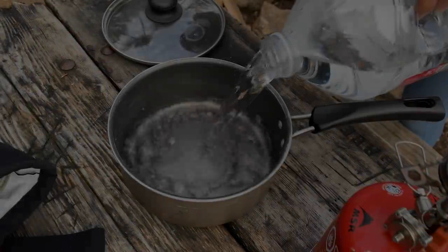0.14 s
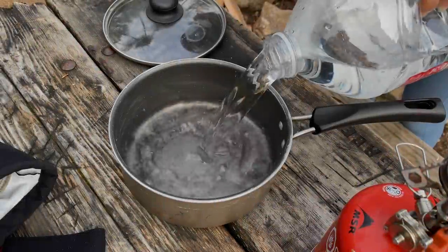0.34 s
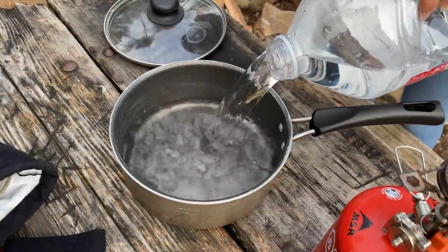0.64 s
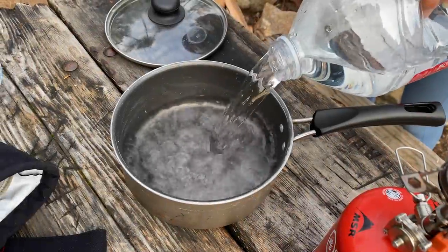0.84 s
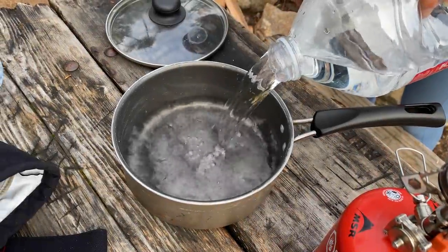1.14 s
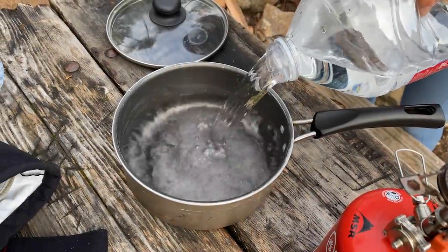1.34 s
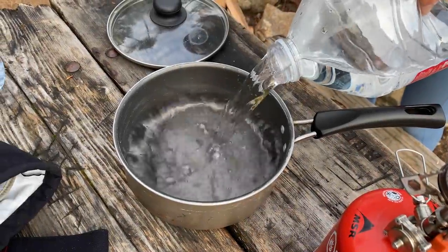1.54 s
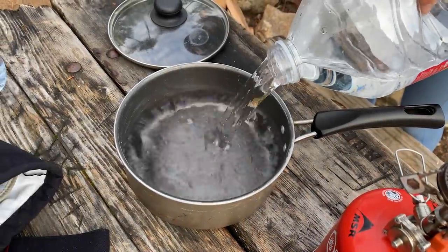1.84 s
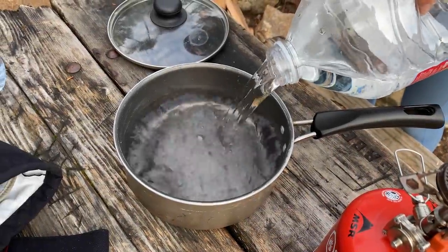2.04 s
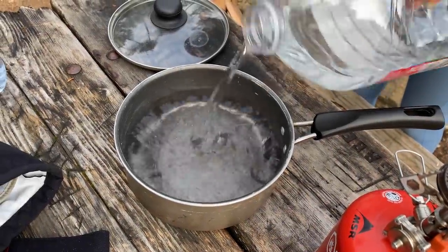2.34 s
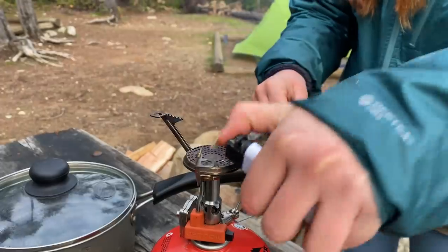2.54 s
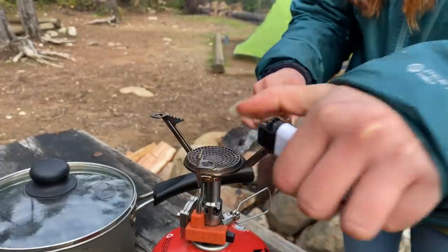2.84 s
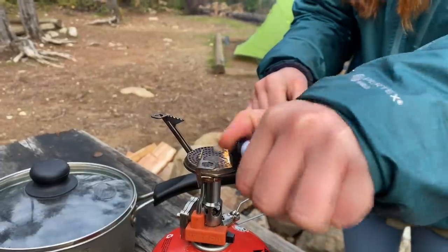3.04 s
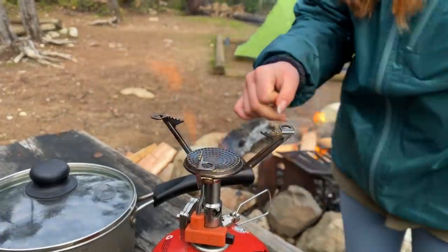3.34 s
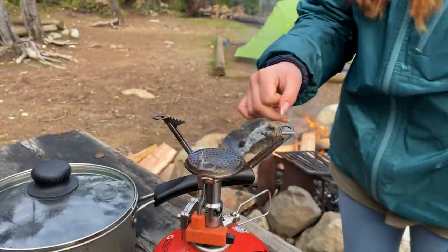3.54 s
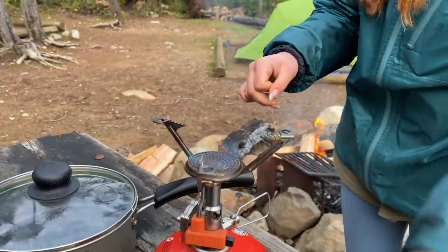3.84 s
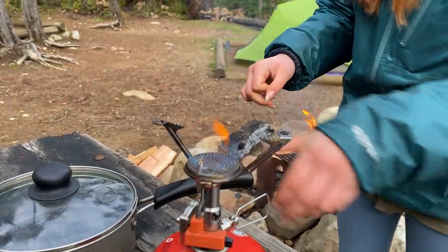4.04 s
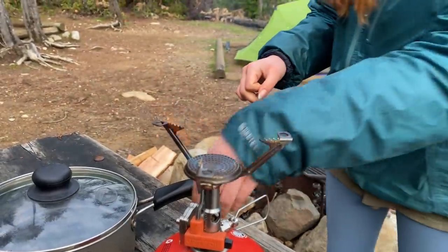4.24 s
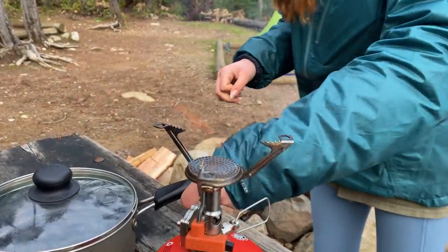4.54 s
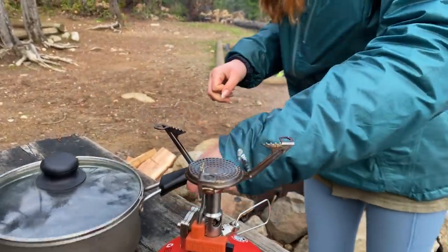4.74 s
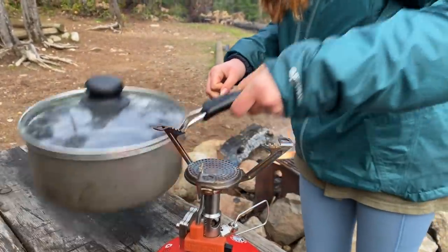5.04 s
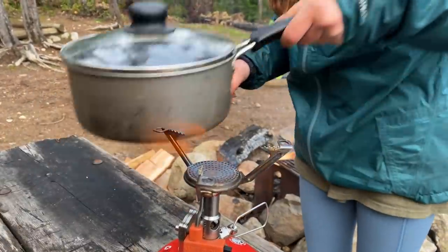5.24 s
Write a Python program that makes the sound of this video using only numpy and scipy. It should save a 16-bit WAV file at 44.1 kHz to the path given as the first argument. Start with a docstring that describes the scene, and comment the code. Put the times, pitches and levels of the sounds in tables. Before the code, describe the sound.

Close outdoor sound. Water pours into a metal pot with lively bubbling and fine splashes, strongest in the first second, then thinning to a trickle with a last few plops. Gas starts hissing, a lighter wheel rasps twice, and the burner catches with a low thump. The flame roars and flutters to the end, while the lighter clacks onto the wooden table with small ticks around it. Faint wind pushes on the microphone.

```python
"""Water and a camp stove outdoors

In a light breeze water pours from a jug into a metal pot: ringing sines for bubbles, puffs of noise for
droplets, noise through pot resonances. Then gas hisses as coloured noise, a lighter wheel is struck twice
as gritty clicks, the gas catches with a pressure thump and the flame roars as fluttering noise. The lighter
drops on the wooden table, its body modes ringing; low wind noise on the microphone and a woodland hush remain.
"""
import sys
import numpy as np
from scipy import signal
from scipy.fft import rfft, irfft, next_fast_len
from scipy.io import wavfile

SR = 44100
rng = np.random.default_rng(int(sys.argv[2]) if len(sys.argv) > 2 else 0)


def store_pcm(level_fs):
    """Save levels as 16-bit WAV."""
    pcm = np.round(np.clip(level_fs, -1, 1) * 32767).astype(np.int16)
    wavfile.write(sys.argv[1], SR, np.atleast_2d(pcm).T)


N = 237903  # samples

# Strength of the stream into the pot, as froth gain: (time [s], level [dB])
POUR_STRENGTH = [(0, -54), (0.14, -59), (0.28, -49), (0.42, -55.5), (0.49, -47), (0.77, -46.5),
                 (0.83, -51.5), (0.9, -44), (0.96, -49), (1.0, -55.5), (1.26, -60), (1.32, -67),
                 (1.46, -59.5), (1.74, -62.5), (1.96, -72), (2.14, -59.5), (2.25, -79), (2.29, -58),
                 (2.43, -61.5)]
SPRAY_DB, SPRAY_GUST_DB = -51, 4  # gain at the strongest flow; spread of the gusts
SPRAY_FOLLOWS = 0.65              # share of the stream's swing in dB
SPRAY_FADE_DB_PER_S = 7           # the spray thins as the pot fills


def water():
    """The stream's strength drives froth and spray; pot walls blend them with the bubbles, over the churning."""
    t = np.arange(N) / SR
    pour_end = POUR_STRENGTH[-1][0]
    froth_db, = in_time(POUR_STRENGTH)
    spray_db = SPRAY_DB + SPRAY_FOLLOWS * (froth_db - froth_db.max())
    spray_db = spray_db - SPRAY_FADE_DB_PER_S * np.minimum(t, pour_end) + SPRAY_GUST_DB * drift(4.3)
    stream = (t < pour_end) * (froth(froth_db) + spray(spray_db))
    return hollow(bubbles() + stream) + pot()


# The clearest bubbles in the pot, level before the onset swell:
# (time [s], starting pitch [Hz], level [dB], 60 dB decay time [s])
CLEAR_BUBBLES = [(0.023, 612, -39, 0.038), (0.097, 3770, -36, 0.011), (0.133, 1420, -21, 0.0098),
                 (0.167, 3900, -33, 0.016), (0.172, 522, -35.5, 0.1), (0.238, 5700, -37.5, 0.02),
                 (0.243, 2070, -40, 0.04), (0.251, 1540, -34.5, 0.022), (0.263, 775, -43, 0.12),
                 (0.288, 6420, -37.5, 0.018), (0.295, 3300, -37, 0.018), (0.41, 4880, -37, 0.025),
                 (0.537, 3460, -35, 0.015), (0.584, 1350, -28.5, 0.031), (0.585, 2820, -28, 0.028),
                 (0.67, 2466, -27, 0.029), (0.673, 5800, -32.5, 0.02), (0.722, 1860, -29, 0.016),
                 (0.731, 1210.0, -33, 0.078), (0.804, 1390, -31.5, 0.026), (0.913, 1200, -30, 0.028),
                 (0.941, 1187, -39, 0.1), (0.943, 1750, -32, 0.018), (1.253, 5640, -43, 0.014),
                 (1.431, 746, -49.5, 0.21), (1.474, 2560, -44, 0.02), (1.509, 990.0, -44, 0.038),
                 (1.551, 2720, -36, 0.018), (1.55, 4780, -40.5, 0.023), (1.556, 1650, -36, 0.023),
                 (1.576, 5500, -37.5, 0.0094), (1.62, 4100, -41.5, 0.047), (1.698, 3100, -36.5, 0.011),
                 (1.7, 3970, -38, 0.033), (1.855, 3580, -39, 0.013), (1.969, 4110, -37, 0.031),
                 (2.008, 3900, -47, 0.021), (2.078, 8170, -45, 0.013), (2.272, 4030, -33, 0.017),
                 (2.287, 1617, -36.5, 0.046), (2.299, 2820, -29, 0.02), (2.311, 1100, -42, 0.02),
                 (2.355, 2680, -38, 0.041), (2.378, 7340, -34, 0.006), (2.385, 1550, -39, 0.04)]


def bubbles():
    """Each bubble is a dying sine with a short slap; pitch climbs, most for big low ones nearing the surface."""
    out = np.zeros(N)
    slap_i = np.arange(400)
    chance = rng.standard_normal((len(CLEAR_BUBBLES), len(slap_i)))
    slaps = signal.lfilter([.3], [1, -1.0, .4], chance) * np.exp(-slap_i / SR / 0.002)
    for (s, hz, level_db, t60), slap in zip(CLEAR_BUBBLES, slaps):
        t = np.arange(int(abs(t60) * SR) + 20) / SR
        pitch = hz * (1 + 0.48 * t / t60 * min(800 / hz, 1.2))
        swell = 1 - np.exp(-t * hz * 3.6)  # the bubble pinches off within a cycle
        decay = from_db(level_db - 60 * t / t60)
        add(out, s, swell * decay * np.sin(2 * np.pi * np.cumsum(pitch) / SR))
        add(out, s, from_db(level_db - 7.5) * slap)
    return out


# Colour of the small bubbles, relative; the rings are also weighted by their pitch:
# (frequency [Hz], level [dB])
FROTH_COLOUR = [(500, -45), (800, -22), (1230, 2), (2240, -0.5), (2560, 2), (4270, -6.5), (7570, -14.5),
                (10000, -38)]
FROTH_PER_S = 5000  # births a second at the strongest flow, before clumping
FROTH_CYCLES = 43   # cycles in the 60 dB decay time of a 2 kHz bubble


def froth(level_db):
    """Small bubbles are born in clumps, more in a stronger flow; each swells and rings some cycles."""
    flow = from_db(0.55 * (level_db - level_db.max()))
    clumps = from_db(2.4 * drift(34))
    born = grains(FROTH_PER_S * flow * clumps, spread_db=5.5) / np.sqrt(flow)
    pitches = np.geomspace(700, 10000, 48)
    dealt = rng.integers(0, len(pitches), N)
    rings = 0
    for k, hz in enumerate(pitches):
        t60 = FROTH_CYCLES * (hz / 2000) ** 0.62 / hz
        # a thin trickle makes mostly middle-sized bubbles
        reach = flow ** (.5 * abs(np.log(hz / 3200)))
        # a second, slightly detuned resonance softens the onset
        ringing = ring(ring(born * (dealt == k), hz, t60), hz * 1.074, t60 / 2)
        rings = rings + reach * from_db(at_hz(FROTH_COLOUR, hz)) * hz * rms_one(ringing)
    # a strong flow blurs the finest bubbles into a wash
    wash = flow * coloured(rng.standard_normal(N), [*FROTH_COLOUR, (15500, -30)])
    return from_db(level_db) * (rms_one(rings) + .8 * wash)


# The clearest droplets landing, level of the click before it becomes a puff: (time [s], level [dB])
CLEAR_DROPLETS = [(0.1326, -48), (0.1955, -40), (0.2229, -39.5), (0.2594, -39), (0.3316, -31), (0.842, -42),
                  (0.877, -36), (0.953, -40), (0.998, -43), (1.1717, -42), (1.2012, -44), (1.2526, -47),
                  (1.3005, -38.5), (2.31, -39)]
SPRAY_PER_S = 1600  # droplets a second at the strongest flow


def spray(level_db):
    """Droplets hit the surface as short bright ticks: a fine patter and a few clear, sharper ones."""
    flow = from_db(.6 * (level_db - level_db.max()))
    patter = grains(SPRAY_PER_S * flow, spread_db=8.5) / np.sqrt(flow)
    soft = burst(patter, 0.012, [6000, 10000])
    sharp = burst(patter, 0.0037, [7000, 15000])
    drops = np.zeros(N)
    for s, click_db in CLEAR_DROPLETS:
        drops[int(s * SR)] = from_db(click_db)
    return from_db(level_db) * rms_one(soft + .5 * sharp) + burst(drops, 0.0027, [7000, 15000])


# Air space of the pot, shaken by the churning water, levels relative:
# (frequency [Hz], width [Hz], level [dB])
POT_RESONANCES = [(413, 47, -19), (475, 110, 1), (990, 55, -1)]
# Hollow wavering notes as the last water settles, level before wavering:
# (start time [s], length [s], pitch before wavering and sinking [Hz], level [dB])
LAST_GLUGS = [(2.334, 0.095, 990, -51), (2.347, 0.11, 1325, -56), (2.401, .085, 800, -54.5)]


def pot():
    """Lumpy churning noise through the hollow resonances of the pot, and the last glugs."""
    churn = from_db(2 * drift(34)) * rng.standard_normal(N)
    strength = churning()
    out = np.zeros(N)
    for hz, width, level_db in POT_RESONANCES:
        t60 = np.log(1000) / (np.pi * width)
        resonance = ring(ring(churn, hz, t60), hz, t60 / 2)
        out += strength * from_db(level_db) * rms_one(resonance)
    for s, length, hz, level_db in LAST_GLUGS:
        t = np.arange(int(length * SR)) / SR
        waver = drift(36)[:len(t)]
        pitch = hz * (1 + 0.034 * waver - 0.027 * t / length)
        note = np.sin(2 * np.pi * np.cumsum(pitch) / SR)
        level = from_db(level_db + 2.8 * drift(39)[:len(t)])
        add(out, s, level * np.sqrt(np.sin(np.pi * t / length)) * note)
    return out


# Spells of churning in the pot, each swelling until it stops:
# (start [s], stop [s], gain at the stop [dB], swell [dB/s])
CHURN_SPELLS = [(0, 0.968, -59, 11.5), (2.345, 2.48, -63, 5)]
CHURN_RELEASE_DB_PER_S = 500


def churning():
    """Gain of the churning: it swells steadily in dB, then falls away fast."""
    t = np.arange(N) / SR
    strength = 0
    for start, stop, stop_db, swell in CHURN_SPELLS:
        slope = np.where(t < stop, swell, -CHURN_RELEASE_DB_PER_S)
        strength = strength + (t > start) * from_db(stop_db - slope * (stop - t))
    return strength


def hollow(x):
    """Sound bounces between the pot walls: a short diffuse tail blends the water."""
    t = np.arange(int(.08 * SR)) / SR
    tail = rms_one(rng.standard_normal(len(t))) * from_db(-24 - 60 * t / 0.034)
    return x + signal.fftconvolve(x, tail)[:N]


# Flame on the stove, levels before flutter: (time [s], roar level [dB], ragged edge level [dB])
FLAME_LEVELS = [(3.115, -32, -44), (3.18, -33, -46), (3.3, -31, -39.5), (3.45, -32, -40),
                (3.62, -29.5, -41), (4.6, -33.5, -44.5), (4.88, -32, -43.5), (5.1, -33.5, -45.5),
                (5.25, -29.5, -44), (5.39, -32, -39)]
# Colour of the low roar, relative: (frequency [Hz], level [dB per Hz])
ROAR_COLOUR = [(24, -48), (40, -15), (125, -5.5), (262, 0), (307, -4), (388, -3.5), (512, -9), (792, -6),
               (1170, -16), (1300, -23), (1690, -22), (2860, -120)]
# Colour of the ragged edge, relative: (frequency [Hz], level [dB per Hz])
EDGE_COLOUR = [(760, -59), (1300, 1.5), (1930, -3.5), (2250, -1), (3450, -10), (4050, -6.5), (4500, -15.5),
               (5100, -14), (5550, -11.5), (6800, -21.5), (8060, -17.5), (9000, -22), (11400, -41),
               (12100, -31), (12700, -36), (15500, -36)]


def flame():
    """Turbulent burning: a low roar and a brighter ragged edge that flutter together."""
    roar_db, edge_db = in_time(FLAME_LEVELS)
    lit = np.clip((np.arange(N) / SR - GAS_CATCHING[0]) / 0.0022, 0, 1)
    flutter = drift(37)
    roar_gain = from_db(roar_db + 0.88 * flutter + 0.52 * drift(6.3))
    edge_gain = from_db(edge_db + 0.93 * flutter + 1.57 * drift(190))
    roar = roar_gain * coloured(rng.standard_normal(N), ROAR_COLOUR)
    edge = edge_gain * coloured(rng.standard_normal(N), EDGE_COLOUR)
    return lit * (roar + edge)


# Colour of the hiss at the nozzle, relative: (frequency [Hz], level [dB per Hz])
HISS_COLOUR = [(590, -42), (1000, -20), (1640, -21.5), (1860, -20.5), (2060, -25), (2740, -15), (3040, -14),
               (4100, -3), (5590, -15.5), (8340, -11), (10300, -26.5), (11900, -24.5), (15500, -28)]
JET_OPENS_S, JET_ATTACK_S, JET_DB = 2.421, 0.018, -47  # start, time constant, level before fluctuation
JET_DIP_DB, JET_RETURN_S = 12, 0.17                    # drop as the gas catches, time to return
JET_SAG_DB_PER_S = 4.5                                 # once burning


def gas_jet():
    """Smooth bright noise from the nozzle: opens, holds, drops as the gas catches, returns while sagging."""
    t = np.arange(N) / SR
    opening = 1 - np.exp(-np.maximum(t - JET_OPENS_S, 0) / JET_ATTACK_S)
    burning = np.maximum(t - GAS_CATCHING[0], 0)
    dip_db = (burning > 0) * JET_DIP_DB * np.clip(1 - (burning / JET_RETURN_S) ** 2, 0, 1)
    level_db = JET_DB - dip_db - JET_SAG_DB_PER_S * burning
    hiss = coloured(rng.standard_normal(N), HISS_COLOUR)
    return opening * from_db(level_db + 1.37 * drift(14)) * hiss


# The gas catching, one row; the rise and fall curves multiply the rebound: (time of the trough [s],
# depth [dB], swell time constant [s], rebound gain [dB], rebound rise [s], rebound fall [s])
GAS_CATCHING = (3.1125, -12, .003, -6, .0018, .008)


def ignition():
    """The gas cloud burns at once: the pressure swells one way, then swings back."""
    s, depth_db, swell, rebound_db, rise, fall = GAS_CATCHING
    t = np.arange(N) / SR - s
    before = np.exp(np.minimum(t, 0) / swell)
    after = np.maximum(t, 0)
    trough = from_db(depth_db) * before * np.exp(-after / rise)
    rebound = from_db(rebound_db) * (1 - np.exp(-after / rise)) * np.exp(-after / fall)
    return rebound - trough


# Lighter wheel on the flint, with build-up and fall as time constants:
# (time of the climax [s], level [dB], build-up [s], fall [s])
WHEEL_STRIKES = [(2.624, -27.5, 0.0058, 0.0039), (2.635, -35, .0003, 0.0022), (2.642, -34, .0003, .001),
                 (3.097, -27.5, 0.0022, 0.0087)]
# Colour of the grinding, relative: (frequency [Hz], level [dB per Hz])
FLINT_COLOUR = [(240, -8), (400, -12.5), (1200, -15), (2510, -11), (5390, -8.5), (5820, -9.5), (6280, -12),
                (7910, -2.5), (9070, -11.5), (15500, -24)]


def lighter_wheel():
    """Teeth grind over the flint: dense gritty clicks that build up and die."""
    t = np.arange(N) / SR
    pressure = 0
    for s, level_db, build, fall in WHEEL_STRIKES:
        shape = np.exp(np.where(t < s, (t - s) / build, (s - t) / fall))
        pressure = pressure + from_db(level_db) * shape
    return pressure * coloured(grains(9000, spread_db=4.5), FLINT_COLOUR)


# Touches of the lighter on table and metal; lows below the contact cut stay unexcited:
# (time [s], peak level [dB], contact cut [Hz])
LIGHTER_TOUCHES = [(3.8005, -24, 5000), (3.830, -6, 496), (4.027, -26, 5000), (4.608, -37, 8000)]
# Modes of the lighter's body, levels relative: (frequency [Hz], level [dB], 60 dB decay time [s])
LIGHTER_MODES = [(670, 3, 0.014), (1180, -13, 0.011), (1670, -10, 0.027), (2030, -5.5, 0.02),
                 (2830, -5, 0.014), (3680, -2, .012), (4330, -3, 0.006), (5770, -4, 0.0035),
                 (7000, -23, 0.011)]


def lighter_ticks():
    """Each touch is a sharp crack and a short rattle into the modes of the plastic body."""
    out = np.zeros(N)
    t = np.arange(int(.06 * SR)) / SR
    chances = rng.standard_normal((len(LIGHTER_TOUCHES), len(t)))
    for (s, peak_db, cut_hz), chance in zip(LIGHTER_TOUCHES, chances):
        rattle = 0.13 * chance * np.exp(-t / 0.0033)
        rattle[0] = 1  # the first contact
        crack = signal.lfilter([.4], [1, -.6], rattle * np.exp(-t / 0.0033))
        body = sum(from_db(level_db) * ring(rattle, hz, t60) for hz, level_db, t60 in LIGHTER_MODES)
        contact = signal.butter(2, cut_hz, "high", fs=SR, output="sos")
        tick = signal.sosfilt(contact, body + 4.2 * crack)
        add(out, s, from_db(peak_db) * tick / abs(tick).max())
    return out


# Breeze on the microphone, levels before drifting: (time [s], slow push level [dB], rumble level [dB])
BREEZE_LEVELS = [(0, -28, -52), (.8, -31, -67), (1.5, -26, -56.5), (2.3, -27, -57), (2.55, -21, -42.5),
                 (3.1, -22, -56), (4.1, -25, -49), (4.5, -30, -59), (5.39, -26.5, -55)]
# Colour of the slow push, relative: (frequency [Hz], level [dB per Hz])
PUSH_COLOUR = [(1.5, 19), (3, 7.5), (14, 10), (22, -9.5), (32, -12), (60, -70)]
# Colour of the wind rumble, relative: (frequency [Hz], level [dB per Hz])
RUMBLE_COLOUR = [(20, -27), (40, 6.5), (80, -9), (180, -19.5), (350, -62)]
# Colour of the woodland hush, relative: (frequency [Hz], level [dB per Hz])
WOODS_COLOUR = [(60, -44), (140, -41.5), (970, -46.5), (1200, -55), (3700, -60), (6000, -67), (15500, -88)]
WOODS_DB = -64  # rms level


def air():
    """Breeze buffets the microphone far down in the bass over a quiet woodland hush."""
    push_db, rumble_db = in_time(BREEZE_LEVELS)
    push = from_db(push_db + 0.52 * drift(2.8)) * coloured(rng.standard_normal(N), PUSH_COLOUR)
    rumble = from_db(rumble_db + 3.8 * drift(4.6)) * coloured(rng.standard_normal(N), RUMBLE_COLOUR)
    hush = from_db(WOODS_DB) * coloured(rng.standard_normal(N), WOODS_COLOUR)
    return push + rumble + hush


def from_db(db):
    """Gain of a level in dB."""
    return 10 ** (np.asarray(db) / 20)


def rms_one(x):
    """Scale to rms 1."""
    return x / np.sqrt(np.mean(x ** 2) + 1e-20)


def in_time(rows):
    """Each column of a table as a curve over all samples."""
    s, *columns = np.transpose(rows)
    return [np.interp(np.arange(N) / SR, s, c) for c in columns]


def at_hz(points, hz):
    """Read a spectrum on a log-frequency axis."""
    table_hz, table_db = np.array(points).T
    return np.interp(np.log(hz), np.log(table_hz), table_db)


def coloured(x, spectrum):
    """Shape a signal by the spectrum; rms 1."""
    size = next_fast_len(N)
    hz = np.maximum(np.arange(size // 2 + 1) * SR / size, .1)
    return rms_one(irfft(rfft(x, size) * from_db(at_hz(spectrum, hz)), size)[:N])


def drift(rate):
    """Slow random wandering of spread 1 with about this many turns a second."""
    r = np.exp(-2 * np.pi * rate / SR)
    noise = rng.standard_normal(N + SR)
    slow = signal.lfilter([1], [1, -2 * r, r * r], noise)[SR:]  # skip the filter's start
    return rms_one(slow - slow.mean())


def grains(per_s, spread_db):
    """Random clicks of uneven size and sign."""
    sizes = from_db(spread_db * np.minimum(rng.exponential(1, N), 4))
    signs = rng.choice([-1, 1], N)
    return sizes * signs * (rng.random(N) < per_s / SR)


def ring(clicks, hz, t60):
    """A resonance: a unit click starts a dying sine of height 1, down 60 dB after t60 seconds."""
    r, w = from_db(-60 / (t60 * SR)), 2 * np.pi * hz / SR
    return signal.lfilter([0, np.sin(w)], [1, -2 * r * np.cos(w), r * r], clicks + 1e-18)


def burst(clicks, t60, band_hz):
    """Each click becomes a dying puff of band-limited noise."""
    envelope = signal.lfilter([1], [1, -from_db(-60 / (t60 * SR))], abs(clicks))
    band = signal.butter(2, band_hz, "band", fs=SR, output="sos")
    return signal.sosfilt(band, envelope * rng.standard_normal(N))


def add(out, s, sound):
    """Mix a sound in from time s."""
    i = int(s * SR)
    out[i:i + len(sound)] += sound[:N - i]


def scene():
    """The pour, then the stove, in the open air, summed at one microphone."""
    stove = gas_jet() + flame() + ignition()
    lighter = lighter_wheel() + lighter_ticks()
    return (water() + stove + lighter + air())[None]


def record(dry):
    """The top is cut steeply, by at least 35 dB from 15950 Hz up."""
    return signal.sosfilt(signal.cheby2(20, 35, 15950, fs=SR, output="sos"), dry)


dry = scene()
out = record(dry)
store_pcm(out)
```